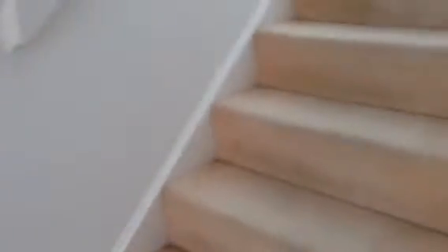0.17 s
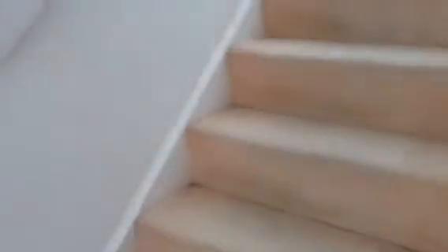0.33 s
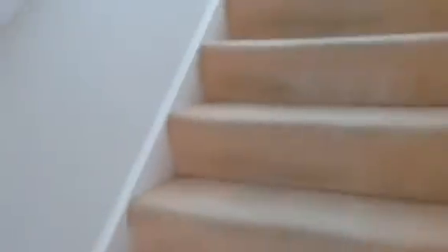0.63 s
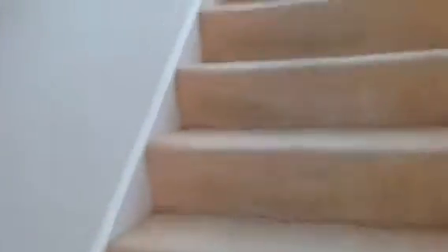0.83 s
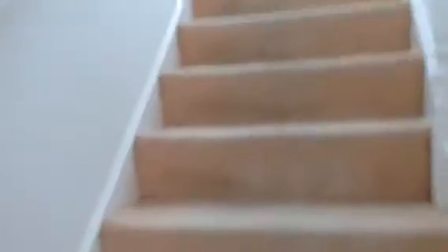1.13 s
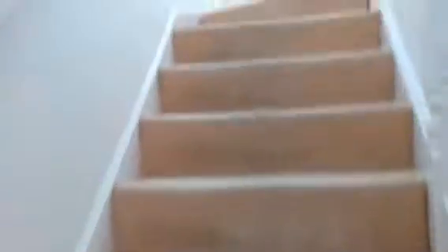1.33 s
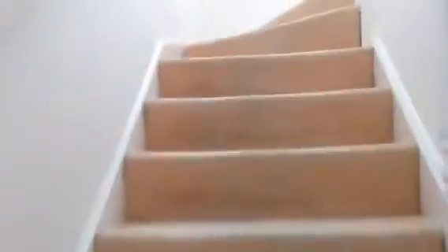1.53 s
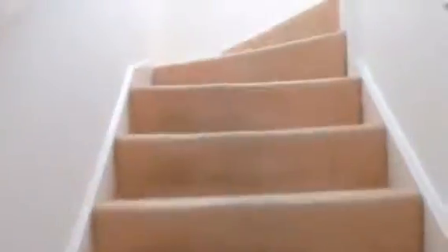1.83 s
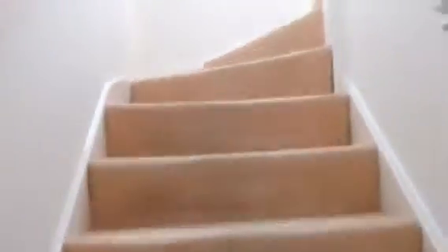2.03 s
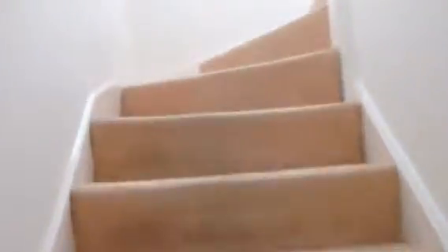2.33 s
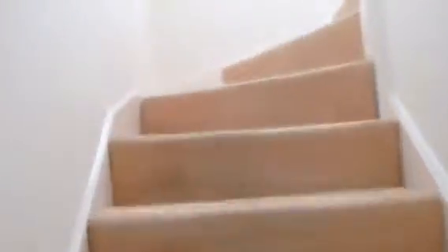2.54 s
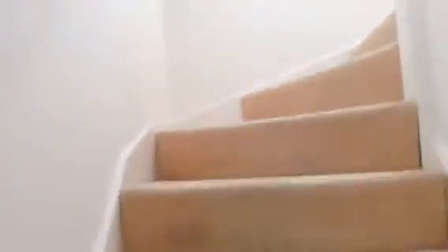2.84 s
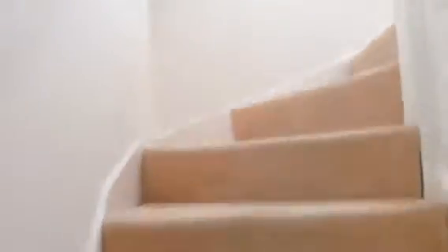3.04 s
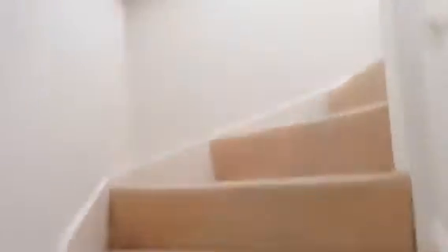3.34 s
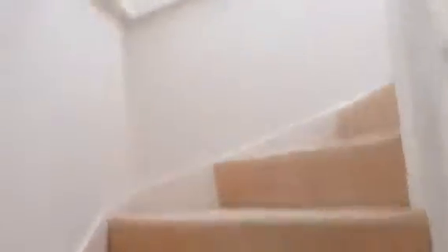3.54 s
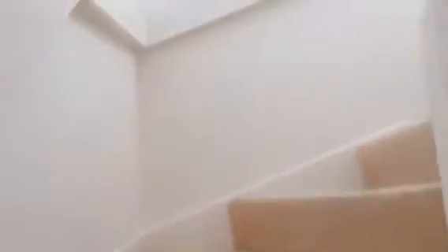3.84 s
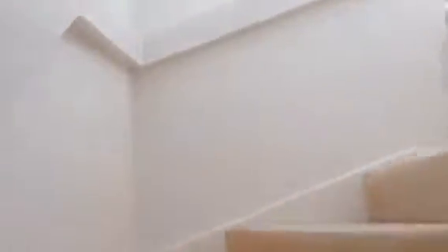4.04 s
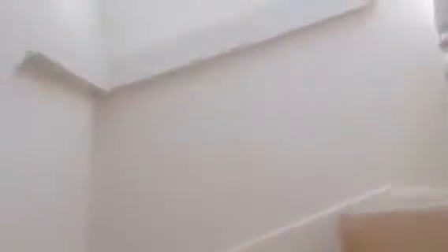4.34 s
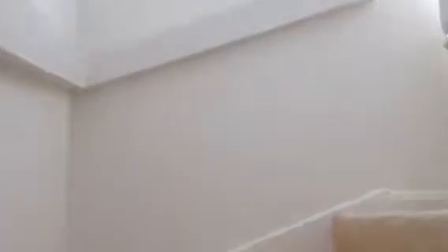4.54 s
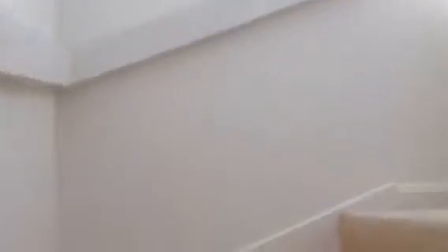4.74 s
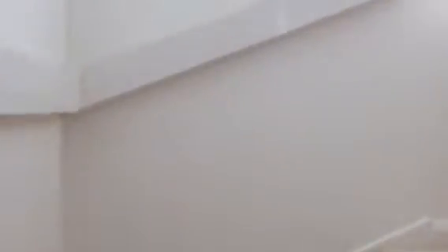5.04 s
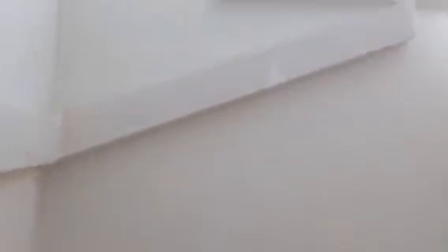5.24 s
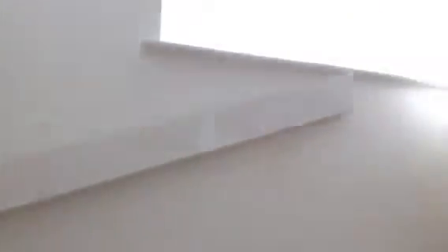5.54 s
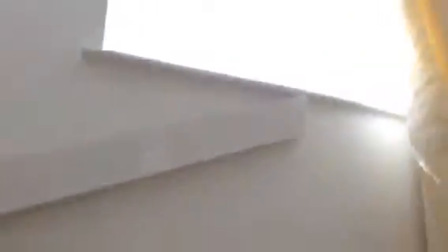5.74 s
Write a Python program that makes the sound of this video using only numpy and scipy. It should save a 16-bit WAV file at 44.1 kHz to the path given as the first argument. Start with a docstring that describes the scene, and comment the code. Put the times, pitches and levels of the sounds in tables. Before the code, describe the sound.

Faint muffled steps on carpeted stairs, then one heavy tread with a hard woody knock, followed by close, soft, irregular thuds and scuffs.

```python
"""Someone climbs carpeted wooden stairs in a narrow stairwell, carrying the microphone.
Faint steps come first: each tread rings at its own pitch, over hiss and clothing rustle made of noise.
Just after two seconds a heavy step lands and one hard knock strikes the resonant modes of the woodwork.
Then footfalls come thick and close, with snaps and scuffs of grainy noise on the carpet pile and a low
groan of filtered noise from the staircase; feet and knock echo off the walls."""
import sys
import numpy as np
from scipy import signal
from scipy.fft import rfft, irfft
from scipy.io import wavfile

SR = 44100
rng = np.random.default_rng(int(sys.argv[2]) if len(sys.argv) > 2 else 0)


def wav_out(sig):
    """Save sig, one row per channel (or a flat mono array), as 16-bit PCM at SR to the path in sys.argv[1]."""
    wavfile.write(sys.argv[1], SR, np.round(np.clip(np.atleast_2d(sig).T, -1, 1) * 32767).astype(np.int16))


def field_ratio(decibels):
    """Amplitude ratio for a level in dB (20 dB per decade); scalars and array-likes work."""
    return 10 ** (np.asarray(decibels, dtype=float) / 20)


N = 259308

# spectrum of the hollow staircase, also the rough edge of each footfall:
# (frequency [Hz], relative density [dB per Hz])
STAIRCASE_SPECTRUM = [(59, -50), (100, -10), (199, 2), (269, 3), (429, -1), (604, -12.5), (706, -11.5),
                      (767, -12.5), (1200, -18.5), (1560, -30), (2640, -120)]
# body weight comes onto a tread and the staircase groans: (time [s], rumble level [dB], boom level [dB])
WEIGHT_ON_TREADS = [(.1, -68, -92), (.64, -63, -92), (.83, -68, -92), (1.15, -71, -87), (1.42, -67, -77),
                    (1.57, -59.5, -88), (1.75, -62.5, -90), (1.95, -67, -81), (2.245, -56, -51),
                    (2.29, -42, -40), (2.39, -48.5, -66), (2.5, -61.5, -73), (2.74, -62, -60),
                    (2.8, -48.5, -61.5), (2.91, -53, -79), (3.0, -59, -78), (3.15, -57.5, -83),
                    (3.37, -55, -67), (3.49, -61, -70), (3.66, -59, -66), (3.89, -63, -85),
                    (3.97, -57.5, -65), (4.07, -54.5, -65), (4.28, -60, -65), (4.575, -73, -69),
                    (4.7, -62, -63), (4.76, -59, -65), (4.885, -54, -59.5), (4.98, -57.5, -64),
                    (5.195, -54.5, -68), (5.3, -66, -68), (5.39, -67, -85), (5.5, -63, -68.5),
                    (5.79, -63, -73)]


def rms_one(x):
    """Scale to rms 1."""
    return x / np.sqrt(np.mean(x ** 2) + 1e-20)


def at_hz(points, hz):
    """Read the second column of a curve on a log-frequency axis."""
    curve_hz, value = np.transpose(points)
    return np.interp(np.log(hz), np.log(curve_hz), value)


def coloured(white, spectrum, tilt_db=0, within_hz=(10, 20000)):
    """White noise given a spectrum and a tilt [dB per octave] about 3 kHz; rms 1 within the band named."""
    hz = np.maximum(np.fft.rfftfreq(len(white), 1 / SR), 10)
    octaves = np.log2(np.clip(hz, 500, 16000) / 3000)
    gain = field_ratio(at_hz(spectrum, hz) + tilt_db * octaves)
    inside = (hz > within_hz[0]) & (hz < within_hz[1])
    band_rms = np.sqrt(np.sum(gain[inside] ** 2) / len(hz))
    return irfft(rfft(white) * gain, len(white)) / band_rms


def flicker(rate_hz, depth_db):
    """A gain that wanders at random: slow noise, its depth an rms in dB."""
    r = np.exp(-2 * np.pi * rate_hz / SR)
    slow = signal.lfilter([1], [1, -2 * r, r * r], rng.standard_normal(N + SR))
    return field_ratio(depth_db * rms_one(slow[SR:]))   # the first second lets the filter settle


def add(out, s, sound):
    """Mix a sound in at a time [s]."""
    i = round(s * SR)
    out[i:i + len(sound)] += sound[:N - i]


def hiss():
    """The microphone's own hiss: coloured noise that wavers a little and swells softly now and then."""
    # (frequency [Hz], relative density [dB per Hz])
    hiss_spectrum = [(12, -54), (20, -22), (74, -27), (214, -11), (751, -13.5), (888, -10), (965, -10.5),
                     (1140, -18.5), (3790, -8), (4480, -9.5), (10300, -9), (15700, -10)]
    # swells, about once a stride: (time [s], level above rest [dB])
    hiss_swells = [(1.2, 2.5), (2.01, 5.5), (2.62, 4), (3.23, 3.5), (3.85, 4), (4.4, 3.8), (5.05, 3),
                   (5.65, 4)]
    rest_db, swell_s = -70, 0.13
    t = np.arange(N) / SR
    level_db = np.full(N, float(rest_db))
    for s, db in hiss_swells:
        level_db += db * np.exp(-((t - s) / swell_s) ** 2)
    wavering = field_ratio(level_db) * flicker(4, depth_db=0.75)
    return wavering * coloured(rng.standard_normal(N), hiss_spectrum, within_hz=(6000, 15000))


def rustle():
    """Clothing close to the microphone: coloured noise whose level follows a curve and flickers finely."""
    # (frequency [Hz], relative density [dB per Hz])
    cloth_spectrum = [(180, -18.5), (300, -10), (361, -4), (636, 0), (884, -2), (1830, -5.5), (2190, -6.5),
                      (7000, -20.5), (9100, -56), (15400, -120)]
    # (time [s], level [dB])
    cloth_level = [(0, -66.5), (.15, -67), (.46, -71), (.86, -61.5), (.97, -67.5), (1.23, -66.5),
                   (1.59, -63.5), (2.16, -65), (2.35, -55.5), (2.68, -67.5), (2.82, -53.5), (2.93, -63.5),
                   (3.36, -66.5), (3.47, -65), (3.64, -68), (3.97, -67.5), (4.09, -61), (4.2, -64.5),
                   (4.6, -67), (5.13, -66), (5.19, -62), (5.29, -63.5), (5.75, -67.5), (5.88, -64.5)]
    s, db = np.transpose(cloth_level)
    level_db = np.interp(np.arange(N) / SR, s, db)
    return field_ratio(level_db) * flicker(23, depth_db=0.5) * coloured(rng.standard_normal(N), cloth_spectrum)


def swishes():
    """Narrow swishes and brief squeaks: noise passed twice through one resonance, swelling and fading."""
    # (start [s], length [s], level [dB], resonance [Hz], width of one pass [Hz])
    swish_rows = [(0.069, 0.089, -66.5, 1090, 1500), (0.17, 0.034, -62, 647, 150),
                  (0.629, 0.066, -62.5, 4200, 1200), (0.785, 0.11, -66.5, 2460, 3000),
                  (1.5, 0.14, -66.5, 2310, 500), (1.651, 0.1, -66, 1000, 600), (2.04, 0.14, -72, 2180, 300),
                  (2.58, 0.17, -70, 5000, 250), (2.885, .11, -53.5, 420, 70),
                  (4.676, 0.083, -55, 2730, 200), (4.682, 0.042, -55, 596, 150),
                  (4.691, 0.1, -57.5, 4100, 1500), (4.751, 0.1, -64, 1374, 80), (4.69, .1, -59, 1100, 700),
                  (4.439, 0.084, -67.5, 730, 250), (4.871, 0.08, -69, 1880, 200)]
    skew = 0.64   # below 1: quick to swell, slow to fade
    out = np.zeros(N)
    t = np.arange(SR // 4) / SR
    for s, length_s, db, hz, width_hz in swish_rows:
        r = np.exp(-np.pi * width_hz / SR)
        resonance = [1, 0, -1, 1, -2 * r * np.cos(2 * np.pi * hz / SR), r * r]
        ringing = rms_one(signal.sosfilt([resonance] * 2, rng.standard_normal(len(t))))
        swell = np.sin(np.pi * np.clip(t / length_s, 0, 1) ** skew)
        add(out, s, field_ratio(db) * swell * ringing)
    return out


def groan(times, levels_db, rest_db, t60):
    """Gain of a low noise: each load builds up to its level and dies away; powers add."""
    load_s = 0.019
    t = np.arange(N) / SR
    power = field_ratio(2 * rest_db)
    for s, db in zip(times, levels_db):
        building = np.exp(-(np.minimum(t - s, 0) / load_s) ** 2)
        dying_db = -60 * np.maximum(t - s, 0) / t60
        power = power + building * field_ratio(2 * (db + dying_db))
    return np.sqrt(power)


def boom():
    """Deep groan of the staircase: noise in a low band, driven by the weight on the treads."""
    s, _, boom_db = np.transpose(WEIGHT_ON_TREADS)
    low_band = signal.butter(4, [88, 150], "band", fs=SR, output="sos")
    deep = rms_one(signal.sosfilt(low_band, rng.standard_normal(N)))
    return groan(s, boom_db, rest_db=-112, t60=0.33) * deep


def rumble():
    """Hollow rumble of the staircase: flickering coloured noise, driven by the weight on the treads."""
    s, rumble_db, _ = np.transpose(WEIGHT_ON_TREADS)
    gain = groan(s, rumble_db, rest_db=-70.5, t60=0.62) * flicker(14.6, depth_db=1.5)
    return gain * coloured(rng.standard_normal(N), STAIRCASE_SPECTRUM)


def stairwell(x):
    """Dense echoes of the narrow walls: noise that dies octave by octave at its own rate."""
    # (frequency [Hz], decay by 60 dB [s])
    echo_decay = [(100, 0.59), (300, 0.16), (1000, 0.42), (4000, 0.35), (12000, 0.32)]
    t = np.arange(SR // 2) / SR
    edges = 60 * 2. ** np.arange(9)
    response = np.zeros(len(t))
    for low, high in zip(edges, edges[1:]):
        octave = signal.butter(2, [low, high], "band", fs=SR, output="sos")
        band = signal.sosfilt(octave, rng.standard_normal(len(t)))
        t60 = at_hz(echo_decay, np.sqrt(low * high))
        response += band * field_ratio(-60 * t / t60)
    response *= np.clip(t / 0.0019, 0, 1)   # the echoes build up over the first 1.9 ms
    response /= np.sqrt(np.sum(response ** 2))
    return signal.fftconvolve(x, response)[:N]


def knock():
    """One stiff half-sine blow strikes every mode of the woodwork at once."""
    # modes of the wood: (frequency [Hz], level relative to the knock [dB], decay by 60 dB [s])
    wood_modes = [(100, -26, .15), (149, -2, 0.13), (190, -19, .15), (242, 4, 0.21), (284, -6, 0.4),
                  (345, 5, 0.072), (399, -10.5, 0.22), (500, -5.5, 0.053), (645, -3.5, 0.065),
                  (707, -3, 0.07), (776, -7.5, 0.2), (956, -14, 0.27), (1074, -8.5, .12), (1390, -28, 0.17),
                  (1620, -23, 0.22), (1714, -10, 0.12), (1857, -7, 0.14), (1956, -0.5, 0.069),
                  (2020, -7, 0.1), (2114, -11, 0.15)]
    knock_s, knock_db, blow_s = 2.2795, -26, 0.00028
    size = max(round(blow_s * SR), 3)
    push = np.sin(np.pi * np.arange(size) / size)
    blow = np.zeros(SR) + 1e-18
    blow[:size] = push / push.sum()
    out = np.zeros(N)
    for hz, db, t60 in wood_modes:
        r, w = field_ratio(-60 / (t60 * SR)), 2 * np.pi * hz / SR
        ring = signal.lfilter([0, np.sin(w)], [1, -2 * r * np.cos(w), r * r], blow)
        add(out, knock_s, field_ratio(knock_db + db) * ring)
    return out


def contacts():
    """A short broadband snap, then a scuffing tail, made grainy by the carpet pile, that dulls and dies."""
    # hard contacts and scuffs: (time [s], level before halving [dB], tail relative to the snap [dB],
    # tail decay by 60 dB [s], tilt [dB per octave])
    contact_rows = [(.6255, -56, -1, 0.33, -4.5), (2.24, -35.5, -10, .25, -3.5),
                    (2.2754, -17.5, -11.5, 0.13, -1.5), (2.2793, -19, -10, 0.22, -7),
                    (2.35, -38.5, -9, .14, -2), (2.418, -41.5, -8, .2, -2), (2.7217, -33, -15, .27, -3.5),
                    (2.7718, -37.5, -8.5, 0.22, -3), (2.8063, -38.5, -8.5, 0.25, -6.5),
                    (2.851, -44, -12, 0.19, -8.5), (3.391, -61, 4, 0.81, -9), (3.6497, -37, -15, 0.35, -5),
                    (3.96, -50, -4.5, 0.36, -6.5), (4.004, -52, -2, 0.2, -4), (4.271, -53, -6.5, .36, -6),
                    (4.604, -54.5, -2, 0.23, -8.5), (4.685, -40, -1, 0.2, -6), (4.70, -45.5, 1, 0.36, -7),
                    (4.87, -45.5, 0.5, 0.43, -5), (4.912, -53, 0.8, 0.51, -6.5),
                    (5.286, -48.5, -3.5, 0.23, -4.5), (5.299, -48, -1.5, 0.13, -8),
                    (5.492, -45.5, -2, 0.27, -4), (5.77, -59, 1.5, 0.42, -13),
                    (5.7943, -42.5, -4.5, 0.25, -4.5)]
    # (frequency [Hz], relative density [dB per Hz])
    scuff_spectrum = [(180, -31), (300, -12.5), (601, -8.5), (734, -24.5), (1020, -7), (1420, -3.5),
                      (1680, -3), (2710, 1), (5530, 0), (14200, -2.5), (15700, -11)]
    snap_s, dulling_s = 0.0045, 0.072
    dulling_db = -1.5   # further tilt per octave: a scuff loses its treble as it dies
    band_hz = (1000, 14000)
    out = np.zeros(N)
    t = np.arange(SR // 2) / SR
    grain = flicker(410, depth_db=3.5)
    snap = t / snap_s * 3 * np.exp(1 - t / snap_s * 3)   # peaks at a third of snap_s
    fresh = np.exp(-t / dulling_s)
    for s, db, tail_db, t60, tilt_db in contact_rows:
        white = rng.standard_normal(len(t))
        own_grain = np.roll(grain, -round(s * SR))[:len(t)]
        tail = field_ratio(tail_db - 60 * t / t60) * (1 - np.exp(-t / snap_s)) * own_grain
        bright = coloured(white, scuff_spectrum, tilt_db, band_hz)
        dull = coloured(white, scuff_spectrum, tilt_db + dulling_db, band_hz)
        scuff = fresh * bright + (1 - fresh) * dull
        add(out, s, field_ratio(db) / 2 * (snap + tail) * scuff)
    return out


def thuds():
    """The carpet softens the push; each tread rings at its own pitch with a shorter overtone and rough edge."""
    # soft footfalls, heel, toe and settling: (time [s], level [dB], tread pitch [Hz], rise [s])
    footfalls = [(.101, -55.5, 260, 0.0086), (0.623, -54, 325, .006), (.645, -53, 266, .01),
                 (.895, -59, 344, 0.0078), (1.209, -60.5, 388, .003), (1.413, -60, 194, 0.0082),
                 (1.571, -57.5, 220, 0.017), (2.218, -32, 446, 0.0047), (2.24, -28, 205, 0.0032),
                 (2.253, -27, 248, 0.0024), (2.72, -45.5, 218, 0.0069), (2.775, -44, 255, 0.0034),
                 (2.797, -45, 295, 0.0018), (2.82, -44.5, 247, 0.0062), (2.895, -49, 401, 0.023),
                 (2.94, -49.5, 338, .005), (2.985, -49.5, 366, 0.0073), (3.125, -48.5, 223, 0.018),
                 (3.198, -52.5, 209, 0.028), (3.355, -50, 209, 0.013), (3.391, -45.5, 193, 0.0023),
                 (3.418, -50, 305, .003), (3.49, -55, 200, .008), (3.534, -45.5, 310, 0.0072),
                 (3.652, -48.5, 207, 0.0098), (3.71, -64, 240, .013), (3.875, -52.5, 276, .039),
                 (3.905, -50, 263, 0.015), (3.954, -53, 383, 0.011), (3.989, -54, 244, 0.0099),
                 (4.059, -43.5, 327, 0.0032), (4.08, -48, 314, .002), (4.105, -51, 293, 0.012),
                 (4.274, -48.5, 254, 0.0033), (4.564, -51.5, 230, 0.0068), (4.603, -47, 219, 0.0094),
                 (4.639, -52, 227, 0.0093), (4.689, -42.5, 235, 0.0036), (4.735, -44.5, 249, .012),
                 (4.795, -57, 240, 0.0097), (4.876, -47, 214, .014), (4.91, -43, 172, 0.0063),
                 (4.95, -43, 190, .005), (4.99, -54, 222, 0.016), (5.039, -55.5, 212, .005),
                 (5.182, -43.5, 188, .016), (5.235, -57, 183, 0.0063), (5.289, -44, 179, 0.0048),
                 (5.369, -57, 190, .006), (5.433, -54, 208, .004), (5.46, -50.5, 185, 0.014),
                 (5.49, -47, 220, .009), (5.551, -51, 190, .008), (5.712, -60, 225, .009),
                 (5.769, -49.5, 178, 0.0033), (5.793, -47, 214, .008), (5.822, -43.5, 198, 0.0037)]
    overtone, overtone_db, rough = 1.63, -9, 0.44   # pitch ratio, level [dB], gain of the noise
    # decay by 60 dB at 250 Hz [s]; a slower push rings longer, a higher pitch shorter
    tread_t60, t60_per_rise, pitch_loss = 0.058, 1.4, 0.35
    out = np.zeros(N)
    t = np.arange(SR // 3) / SR
    for s, db, hz, rise in footfalls:
        t60 = tread_t60 * (250 / hz) ** pitch_loss + t60_per_rise * rise
        dying = field_ratio(-60 * np.maximum(t - rise, 0) / t60)
        loading = np.sin(np.pi / 2 * np.minimum(t / rise, 1))   # weight comes on, then the tread rings out
        ring = np.sin(2 * np.pi * hz * t)
        ring += field_ratio(overtone_db) * dying * np.sin(2 * np.pi * overtone * hz * t)
        edge = rough * coloured(rng.standard_normal(len(t)), STAIRCASE_SPECTRUM)
        add(out, s, field_ratio(db) * loading * dying * (ring + edge))
    return out


def scene():
    """Feet and knock in the stairwell, with groaning stairs, rustle, swishes and hiss."""
    soft = thuds()
    hard = contacts() + knock()
    echoes = stairwell(field_ratio(-7) * soft + field_ratio(-9) * hard)
    low_cut = signal.butter(4, 95, "high", fs=SR, output="sos")
    feet = signal.sosfilt(low_cut, soft + hard + echoes + rumble())
    return (feet + boom() + rustle() + swishes() + hiss())[None]


def band_limit(x):
    """A steep low-pass at the top of the band."""
    return signal.sosfilt(signal.butter(12, 15850, fs=SR, output="sos"), x)


def record(dry):
    """The top is cut steeply above 15480 Hz."""
    top_cut = signal.ellip(10, 0.5, 60, 15480, fs=SR, output="sos")
    mix = signal.sosfilt(top_cut, dry)
    return band_limit(mix)


dry = scene()
out = record(dry)
wav_out(out)
```